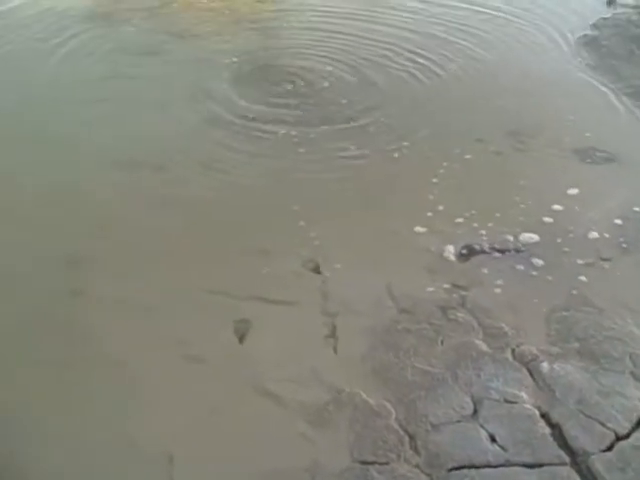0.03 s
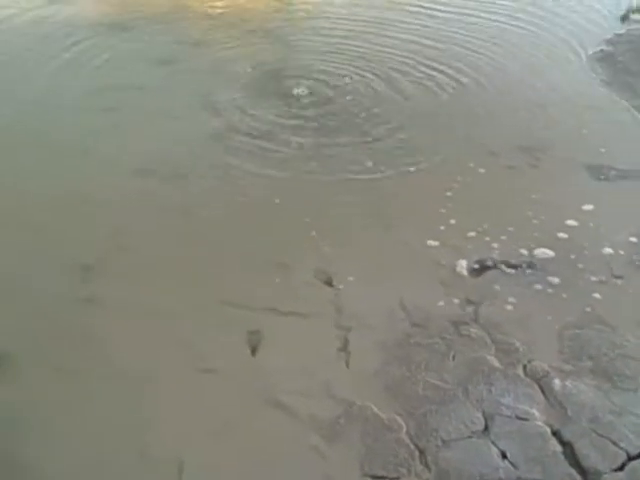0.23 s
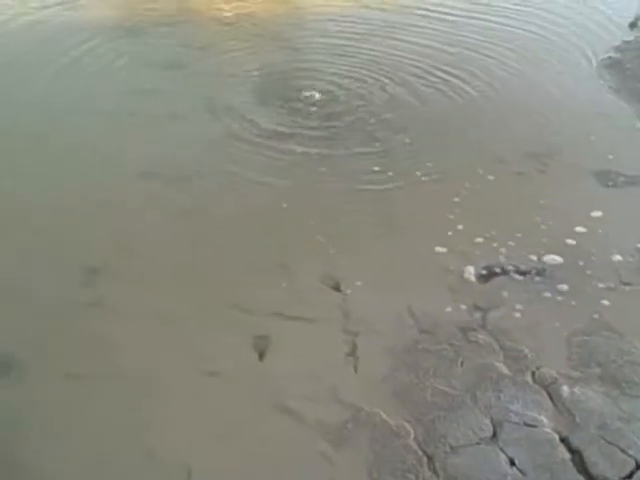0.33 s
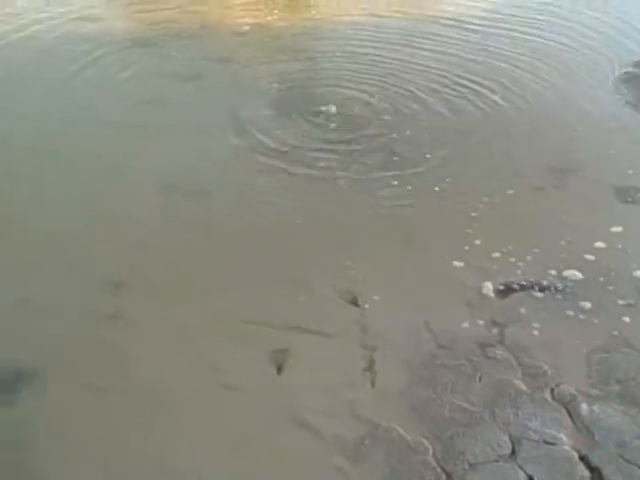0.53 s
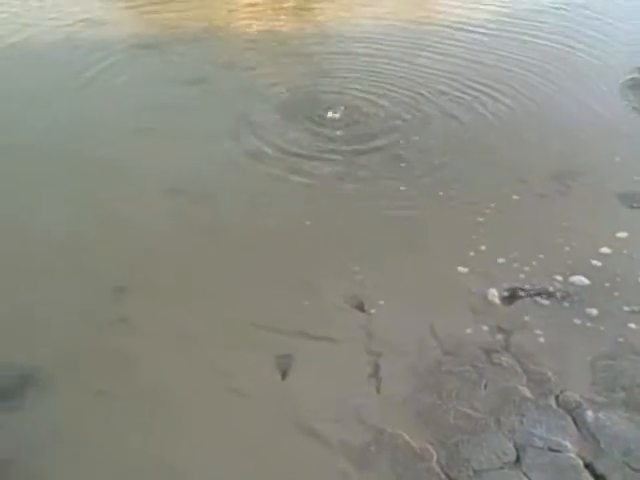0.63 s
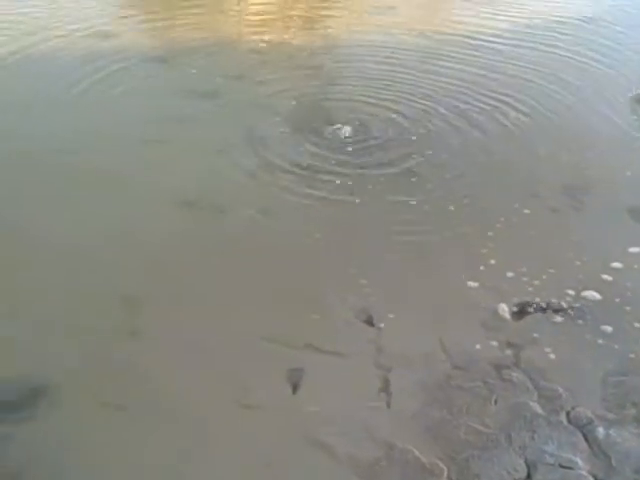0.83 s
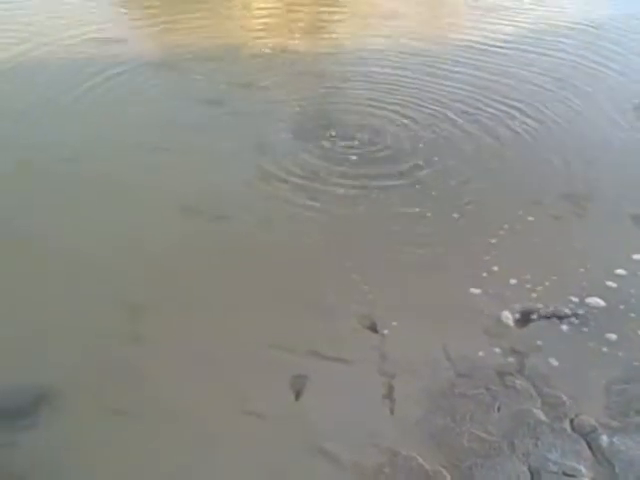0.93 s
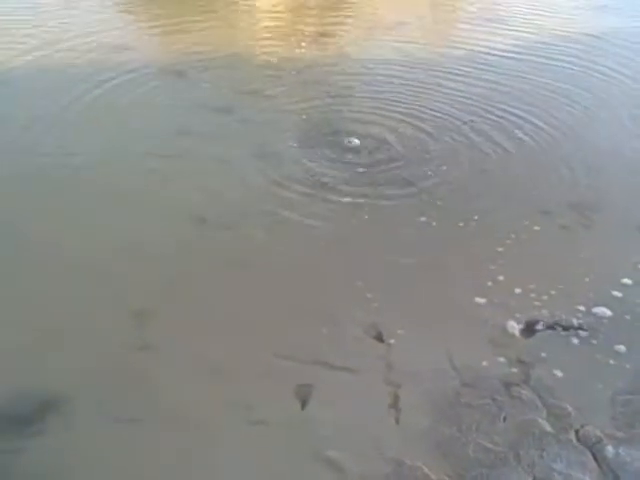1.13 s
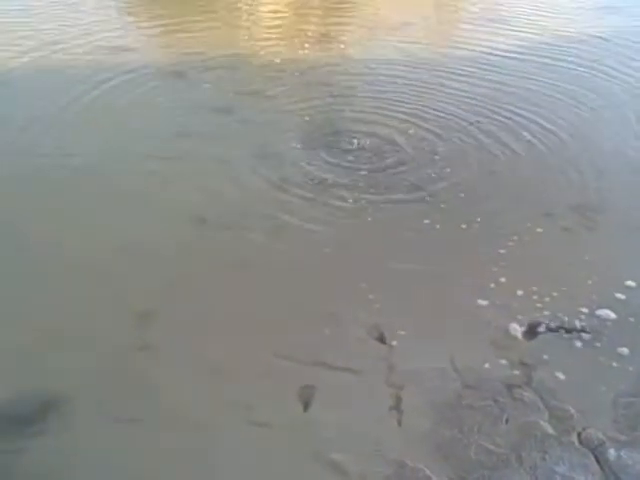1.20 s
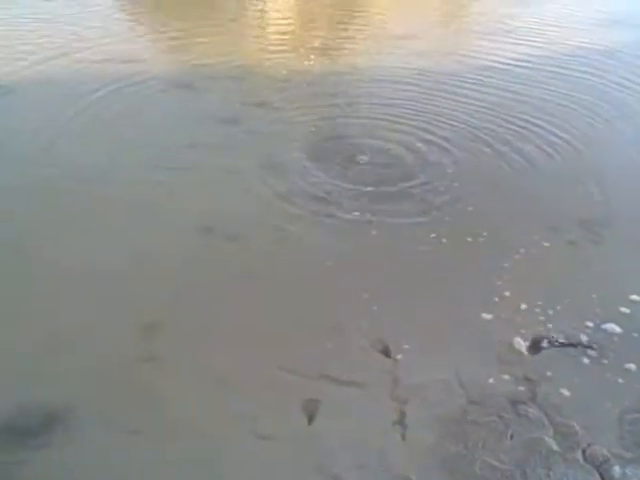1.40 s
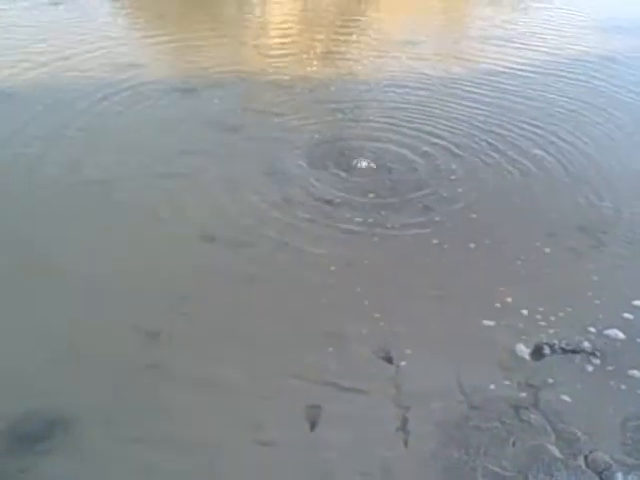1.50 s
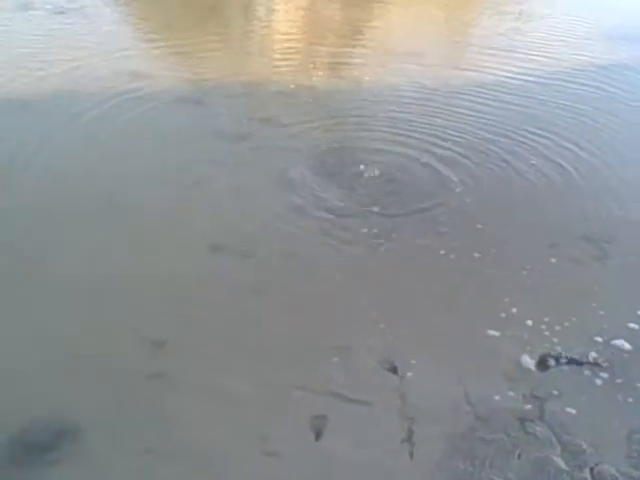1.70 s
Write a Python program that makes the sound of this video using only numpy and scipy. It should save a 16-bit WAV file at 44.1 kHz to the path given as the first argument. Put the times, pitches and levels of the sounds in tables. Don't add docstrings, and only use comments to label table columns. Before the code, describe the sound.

Gas bubbling through shallow muddy water, sharp plops then a splashy blip, with wind rumbling on the microphone

```python
import sys
import numpy as np
from scipy import signal
from scipy.fft import rfft, irfft
from scipy.io import wavfile
from scipy.ndimage import uniform_filter1d

SR = 44100
rng = np.random.default_rng(int(sys.argv[2]) if len(sys.argv) > 2 else 0)


def boost_factor(decibels):
    exponent = np.asarray(decibels, float) / 20
    return 10 ** exponent


def to_wav(sig):
    pcm = np.clip(np.atleast_2d(sig), -1, 1) * 32767
    pcm = np.round(pcm).astype(np.int16)
    wavfile.write(sys.argv[1], SR, pcm.T)


N = 77175


def evened(x):
    return x / np.sqrt(np.mean(x ** 2) + 1e-20)


def steadied(x, size):
    return x / np.sqrt(uniform_filter1d(x ** 2, size=size) + 0.17)


def smoothed(x, size, axis=-1):
    return uniform_filter1d(x, size=size, axis=axis)


def read(points, hz):
    f, value = np.transpose(points)
    return np.interp(np.log(hz + 1), np.log(f + 1), value)


def follow(curve, axis=1):
    columns = np.transpose(curve)
    return np.interp(np.arange(N) / SR, columns[0], columns[axis])


def add(mix, s, sound):
    part = mix[max(round(s * SR), 0):][:len(sound)]
    part += sound[:len(part)]


def noise(shape, patchy_db, size):
    frames, hz = 4 * N // size + 5, np.fft.rfftfreq(size, 1 / SR)
    real, imag, patches = rng.standard_normal((frames, len(hz), 3)).T
    patches = evened(smoothed(smoothed(patches, size // 100, axis=0), 6, axis=1))
    inside = (hz > shape[0][0] * .5) & (hz < shape[-1][0] * 1.5)
    gain = boost_factor(read(shape, hz)[:, None] + patchy_db * patches) * inside[:, None]
    z = (real + 1j * imag) * gain
    return evened(signal.istft(z, nperseg=size, noverlap=size - size // 4)[1][:N])


def chirp(hz, octaves, length, peak_at=.45):
    count = max(round(length * SR), 8)
    u = np.arange(count) / count
    swell = np.sin(np.pi * u ** (np.log(.5) / np.log(np.clip(peak_at, .05, .95))))
    glide = 1 - (1 - u) ** 1.8
    return swell * np.sin(2 * np.pi * np.cumsum(hz * 2 ** (octaves * glide)) / SR)


# start in seconds, peak level in dB, start frequency in Hz, rise in octaves, length in seconds.
BUBBLE_CHIRPS = [(.0, -61, 694, 0.2, 0.022), (.008, -58, 560, .2, .038), (.05, -61, 152, 0.71, 0.05),
                 (0.107, -60.5, 673, 0.11, 0.023), (.148, -51.5, 206, 0.12, 0.04),
                 (.325, -62.5, 698, 0.33, 0.033), (.351, -56.5, 1470, 0.079, 0.015),
                 (.363, -49, 1195, .45, .009), (.384, -51.5, 603, .5, .012), (.384, -54, 1254, .35, .012),
                 (.462, -47.5, 1256, .1, .0087), (.468, -50.5, 928, .07, 0.0091),
                 (.478, -54.5, 1550, -0.091, .016), (.484, -51, 954, .05, 0.0098),
                 (.447, -58, 2930, .02, 0.013), (.446, -59, 3520, 0.013, .008),
                 (.415, -61, 3110, .02, 0.0087), (.381, -58.5, 2620, -0.014, 0.0088),
                 (0.562, -54.5, 855, 0.22, 0.013), (.593, -49, 960, .05, .016), (.593, -52, 500, 1.3, .028),
                 (0.774, -64, 775, 0.032, 0.052), (.866, -55, 310, 1.15, .042),
                 (1.236, -58, 540.7, .7, .034), (1.246, -55, 680, .25, .016),
                 (1.565, -53, 973, -0.025, .009), (1.612, -52, 1274, 0.0079, .013),
                 (1.619, -52, 1250, .05, .014), (1.607, -48, 680, 0.062, .012),
                 (1.703, -55.5, 364, 0.14, 0.0099), (1.162, -65, 475, 0.5, 0.017),
                 (1.6505, -48, 1300, .2, .005), (1.642, -58, 1800, 0.18, .008),
                 (1.695, -52, 1120, .05, .013), (1.726, -52, 640, .25, .013)]


def bubbles():
    out = np.zeros(N)
    for s, db, hz, octaves, length in BUBBLE_CHIRPS:
        tone = chirp(hz, octaves, length, peak_at=0.4)
        wobble = evened(smoothed(smoothed(rng.standard_normal(4000), 80), 80))[:len(tone)]
        wobble_db = 2 * wobble
        add(out, s, boost_factor(db + wobble_db) * tone)
    return out


def pop(hz):
    t = np.arange(700) / SR
    cycles, sag, puff_share = 2.2, 0.75, 0.22
    fade = np.exp(-t * hz / cycles * 2) * np.minimum(t / 0.00065, 1)
    sagging_hz = hz * (1 - sag * (1 - np.exp(-t / 0.0052)))
    ring = np.sin(2 * np.pi * np.cumsum(sagging_hz) / SR)
    puff = evened(signal.lfilter([1], [1, -1.6, .66], rng.standard_normal(len(t))))
    return fade * (ring + puff_share * puff)


# start in seconds, peak level in dB, cavity frequency in Hz.
SKIN_BURSTS = [(0.048, -45.5, 1740), (.473, -42, 1610), (.416, -44, 900), (.449, -29, 1105),
               (.469, -45.5, 1010), (0.486, -41.5, 1000), (.568, -53, 2370), (1.218, -47.5, 1100),
               (1.275, -47, 850), (1.281, -44.5, 2115), (1.375, -50.5, 700), (1.506, -50, 895),
               (.091, -47.5, 700)]


def pops():
    out = np.zeros(N)
    for s, db, hz in SKIN_BURSTS:
        add(out, s, boost_factor(db) * pop(hz))
    return out


# start in seconds, peak level in dB, start frequency in Hz, length in seconds.
CRATER_GULPS = [
    (0.41, -40, 407, 0.012),
    (.451, -34.5, 551, 0.0077),
]


def gulps():
    out = np.zeros(N)
    for s, db, hz, length in CRATER_GULPS:
        add(out, s, boost_factor(db) * chirp(hz, -1.54, length, peak_at=0.32))
    return out


# multiple of the fundamental, level in dB.
VENT_HARMONICS = [(1, -6.5), (2, -3.5), (3, -13), (4, -14.5), (5, -32)]


def vent():
    out = np.zeros(N)
    start_s, level_db, fundamental_hz, length_s, rise_octaves = 1.578, -45, 545, .021, .08
    for k, db in VENT_HARMONICS:
        squeak = chirp(k * fundamental_hz, rise_octaves, length_s, peak_at=0.25)
        add(out, start_s, boost_factor(level_db + db) * squeak)
    return out


def splash(hz, width_hz, length):
    ragged_db = 2.7 * evened(smoothed(rng.standard_normal(4096), 50))
    raw = rng.standard_normal(4096) * boost_factor(ragged_db)
    band = np.exp(-((np.fft.rfftfreq(4096, 1 / SR) - hz) / width_hz) ** 2 * 2)
    count = round(length * SR)
    u = np.arange(count) / count
    return evened(irfft(rfft(raw) * band)[:count]) * np.sin(np.pi * u ** 0.49)


# start in seconds, level in dB, centre in Hz, width in Hz, length in seconds.
RAGGED_SPLASHES = [(.378, -63, 3110, 1220, .022), (.345, -80, 8000, 900, 0.043),
                   (0.44, -71.5, 6500, 2800, 0.061), (.484, -58, 3350, 600, .016),
                   (.499, -64, 3300, 900, .025), (.488, -63, 2240, 350, .05), (.568, -64, 2420, 910, 0.024),
                   (1.143, -68.5, 3250, 2520, 0.066), (1.269, -69.5, 2000, 640, 0.044),
                   (1.586, -61.5, 3050, 1000, 0.07), (1.608, -59.5, 6000, 1000, 0.031),
                   (1.607, -48, 1900, 2200, .013), (1.618, -55.5, 1420, 1400, 0.034),
                   (1.614, -50.5, 2920, 570, 0.0048), (1.618, -49.5, 3504, 670, 0.016),
                   (1.652, -53, 1750, 1100, .022)]


def splashes():
    out = np.zeros(N)
    for s, db, hz, width_hz, length in RAGGED_SPLASHES:
        add(out, s, boost_factor(db) * splash(hz, width_hz, length))
    return out


# start in seconds, peak level in dB,
# frequency in Hz.
SHARP_BURSTS = [(1.6085, -38, 900), (1.6088, -42, 2300), (1.6125, -40, 1300), (1.6143, -43, 2100),
                (1.6165, -38, 1600), (1.6538, -38.5, 1500), (1.6595, -49, 1900), (.0915, -51, 1900),
                (.064, -54, 1300), (.274, -57, 800), (.412, -44, 1350), (.571, -55, 1900),
                (1.085, -53, 900), (1.392, -52, 800), (1.393, -55, 1700), (1.481, -53, 1850),
                (1.481, -54, 1050), (1.481, -56, 500)]


def sharp_bursts():
    out, t = np.zeros(N), np.arange(600) / SR
    for s, db, hz in SHARP_BURSTS:
        fade = np.exp(-t * hz / 1.1) * np.minimum(t * hz * 2, 1)
        ring = fade * np.sin(2 * np.pi * hz * t)
        add(out, s, boost_factor(db) * ring / abs(ring).max())
    return out


# time in seconds, level in dB.
WATER_CHURN = [(0, -60), (.13, -66), (.2, -85.5), (.33, -68), (.36, -60.5), (.41, -58), (.435, -65),
               (.46, -54), (.51, -59.5), (.56, -65.5), (.64, -72.5), (1.1, -75), (1.28, -65.5), (1.33, -71),
               (1.55, -68), (1.59, -58), (1.604, -66), (1.63, -58), (1.67, -57), (1.75, -64)]
# frequency in Hz, density in dB per Hz.
FIZZ_SPECTRUM = [(240, -25.5), (400, 1.5), (1080, -3.5), (1250, -3), (1870, -5), (3580, -17.5), (4440, -25),
                 (7000, -27.5), (9100, -41), (15400, -120)]
# time in seconds, level in dB.
SPRAY_LEVEL = [
    (1.6, -78),
    (1.66, -65),
    (1.7, -62.5),
    (1.75, -55.5),
]
# frequency in Hz, density in dB per Hz.
SPRAY_SPECTRUM = [(300, -10.5), (800, -3), (1400, -9), (2700, -9), (4200, -6), (5600, -9), (7400, -15.5)]


def fizz():
    per_s, kinds = 1500, 30
    happens = rng.random(N) < per_s / SR
    size = boost_factor(2.5 * np.minimum(rng.exponential(1, N), 3)) * happens
    kind, grains = rng.integers(0, kinds, N), np.zeros(N)
    for k, hz in enumerate(np.geomspace(FIZZ_SPECTRUM[0][0], FIZZ_SPECTRUM[-1][0], num=kinds)):
        cycles = rng.uniform(3, 6.2) * (1 + hz / 3500)
        tone = chirp(hz, 0.23, cycles / hz, peak_at=0.39)
        grain = tone * boost_factor(read(FIZZ_SPECTRUM, hz)) * hz / np.sqrt(cycles)
        grains += signal.oaconvolve(size * (kind == k), grain)[:N]
    wet = boost_factor(-5) * evened(grains) + boost_factor(-4) * noise(FIZZ_SPECTRUM, patchy_db=4.5, size=512)
    spray = boost_factor(follow(SPRAY_LEVEL)) * noise(SPRAY_SPECTRUM, patchy_db=1.5, size=512)
    return boost_factor(follow(WATER_CHURN)) * wet + spray


# time in seconds, level in dB, share of fast eddies in dB.
WIND_GUSTS = [(0, -55.5, -4), (.215, -57.5, -1.5), (.24, -43.5, -15.5), (.31, -40, -15.5), (.35, -37.5, -7),
              (.46, -37, -4), (.54, -38.5, -6), (.61, -38.5, -7.5), (.63, -42.5, -15.5), (.7, -42.5, -10.5),
              (.73, -51, -15), (.77, -42, -13), (.93, -47.5, -11.5), (1.06, -49, -8), (1.2, -47, -8.5),
              (1.3, -47, -14), (1.45, -50, -10), (1.66, -55, -6), (1.72, -48.5, -5.5)]
# frequency in Hz, density in dB per Hz.
BUFFET_SPECTRUM = [(14, -17.5), (24, -5), (34, 8.5), (55, 0.5), (80, -3), (120, -20.5), (200, -32.5),
                   (400, -63)]
# frequency in Hz, density in dB per Hz.
EDDY_SPECTRUM = [(50, -33), (85, 0), (130, 2.5), (200, -8), (320, -16.5), (700, -27)]
# start in seconds, peak level in dB, frequency in Hz.
WIND_PUFFS = [(.234, -31, 44), (.265, -32, 30.2), (0.3473, -25, 40), (0.3887, -26.5, 42),
              (0.4107, -21.5, 65.8), (.448, -27.5, 80), (.4635, -26, 66), (.485, -33, 40), (.5035, -28, 60),
              (.325, -34, 62), (.552, -29.5, 28), (.583, -28.5, 31), (.65, -36, 39.5), (.68, -33.5, 39.7),
              (.752, -38.5, 40.2), (.8165, -32, 29.1), (1.097, -37.5, 34.3), (1.155, -32.5, 36.1),
              (1.222, -33, 40), (1.2185, -41, 120), (1.329, -42, 24.3), (1.43, -42, 28), (1.475, -41, 22),
              (.15, -50, 130)]


def wind():
    low = steadied(noise(BUFFET_SPECTRUM, patchy_db=2.5, size=4096), size=4400)
    eddies = steadied(noise(EDDY_SPECTRUM, patchy_db=1.0, size=2048), size=2000)
    buffet_strength = np.sqrt(abs(smoothed(low ** 2, 700)))
    eddies = evened(eddies * (0.13 + buffet_strength))
    out = boost_factor(follow(WIND_GUSTS)) * (low + boost_factor(follow(WIND_GUSTS, axis=2)) * eddies)
    for s, db, hz in WIND_PUFFS:
        add(out, s, boost_factor(db) * chirp(hz, 0, 1.05 / hz, peak_at=0.49))
    return out


# frequency in Hz, density in dB per Hz.
AIR_SPECTRUM = [(150, -5), (400, -16), (1500, -19), (3850, -23.5), (4150, -36.5), (5150, -36.5),
                (5400, -27), (5900, -35.5)]


def air():
    return boost_factor(-66) * noise(AIR_SPECTRUM, patchy_db=2, size=1024)


def scene():
    pool = bubbles() + pops() + gulps() + splashes() + vent()
    return (pool + sharp_bursts() + fizz() + wind() + air())[None]


def holes(x):
    hz, _, z = signal.stft(x, SR, nperseg=2048, noverlap=1536)
    chance = rng.standard_normal(z.shape[1:][::-1]).T
    chance = smoothed(smoothed(chance, 6, axis=0), 6, axis=1)
    strength = abs(z[0])
    usual = np.median(strength, axis=1)[:, None]
    chosen = (chance < np.quantile(chance, .36)) & (strength < 1.7 * usual)
    gated = chosen | (strength < .6 * usual)
    gated &= ((hz > 1650) & (hz < 4050))[:, None]
    return signal.istft(z * boost_factor(-26 * gated), SR, nperseg=2048, noverlap=1536)[1][:, :N]


def top_cut(x):
    return signal.sosfilt(signal.butter(12, 8150, fs=SR, output="sos"), x)


def record(dry):
    edge = signal.firwin(3001, 7290, window=("kaiser", 9), fs=SR)
    leak = signal.firwin(61, 7500, fs=SR)
    x = holes(dry)
    kept = signal.oaconvolve(x, edge[None], "same")
    bright = signal.sosfilt(signal.butter(2, 1000, "high", fs=SR, output="sos"), x)
    loud_db = 10 * np.log10(abs(smoothed(bright ** 2, 1000)) + 1e-12)
    leak_db, knee_db = -10.5, -56
    leak_gain = boost_factor(leak_db + np.minimum(loud_db - knee_db, 0))
    over = leak_gain * signal.oaconvolve(x - kept, leak[None], "same")
    hiss = boost_factor(-104) * rng.standard_normal(x.shape)
    return top_cut(kept + over + hiss)


dry = scene()
out = record(dry)
to_wav(out)
```